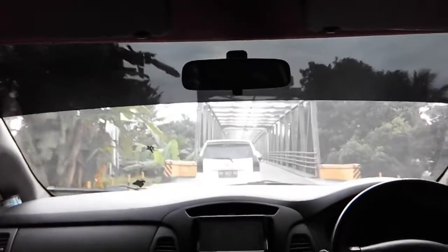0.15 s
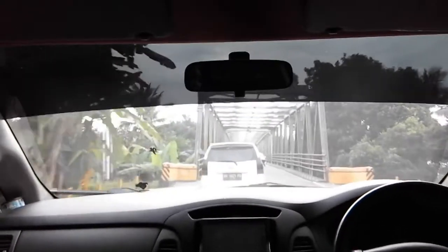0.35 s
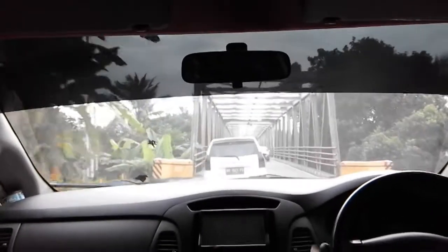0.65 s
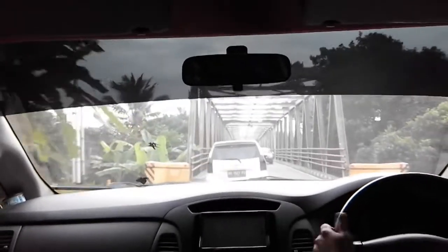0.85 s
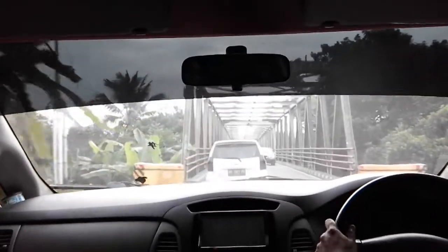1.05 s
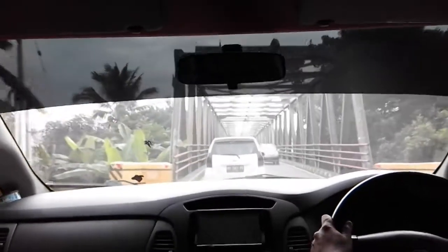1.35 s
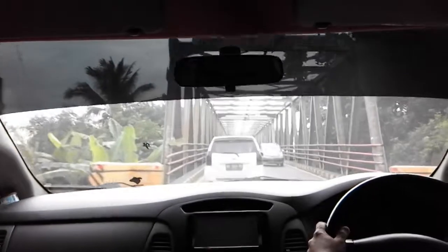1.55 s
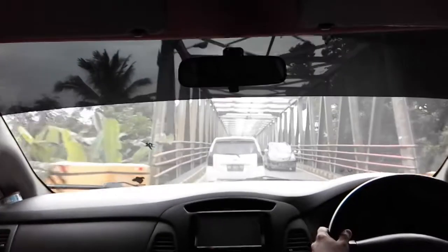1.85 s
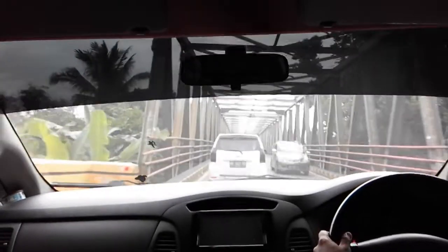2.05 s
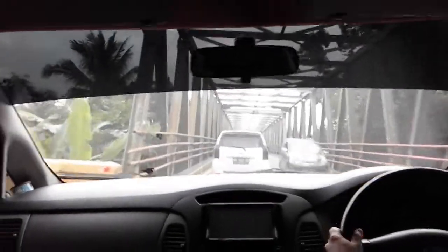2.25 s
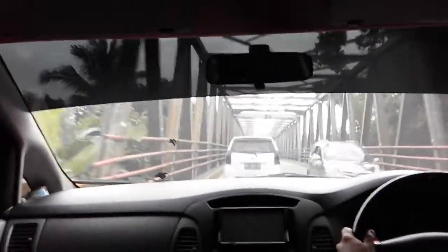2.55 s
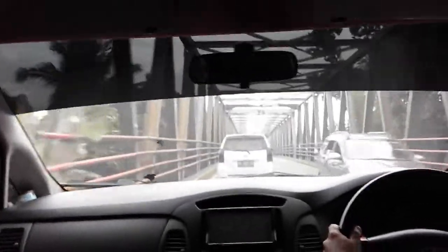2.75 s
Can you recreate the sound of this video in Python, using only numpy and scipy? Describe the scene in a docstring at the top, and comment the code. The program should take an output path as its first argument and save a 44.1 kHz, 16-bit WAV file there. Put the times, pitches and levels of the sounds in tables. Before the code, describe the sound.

A car drones along, heard from the cabin, its trim ticking and rattling at a bump.

```python
"""Inside a car rolling slowly onto a steel bridge. From the start the engine drones at a low, almost
steady firing rate, its second harmonic booming in the cabin, while road rumble comes up through the
floor. Loose trim soon begins to tick and squeak. Just after 2 s the wheels cross the joint: the floor
thuds and drums, the trim rattles, and the tyre hiss of an oncoming car swells."""
import sys
import numpy as np
from scipy import signal
from scipy.io import wavfile

SR = 44100
rng = np.random.default_rng(int(sys.argv[2]) if len(sys.argv) > 2 else 0)


def wrap_up_sound(samples):
    """Save the sound to the file named by the first command line argument, as 16-bit audio."""
    columns = np.atleast_2d(samples).T
    # keep every value between -1 and 1, then stretch to whole-number steps
    tamed = np.clip(columns, -1, 1)
    steps = np.round(tamed * 32767).astype(np.int16)
    wavfile.write(sys.argv[1], SR, steps)


N = 128331


def engine():
    """Periodic excitation: firing drives a harmonic series, with more phase jitter in higher harmonics."""
    # firing rate: t/s, f/Hz
    firing = [(0, 48.6), (.4, 48.2), (.7, 47.8), (1.5, 47.8), (1.9, 48.2), (2.2, 48.5), (2.7, 48.6),
              (2.91, 48.2)]
    # harmonics 1 (engine load), 2 (cabin boom), 3, 5 and 7: t/s, level/dB
    load = [(0.03, -46.5), (0.09, -50), (0.17, -45), (0.92, -35.5), (2.47, -34), (2.54, -37), (2.61, -38),
            (2.78, -37), (2.85, -33), (2.88, -36)]
    boom = [(0.03, -47), (0.07, -51), (0.13, -36), (0.26, -42), (0.3, -35), (0.42, -39.5), (0.5, -29.5),
            (0.57, -32.5), (0.62, -45), (0.66, -31.5), (0.72, -29.5), (0.78, -33.5), (0.86, -28.5),
            (1.01, -29), (1.05, -48), (1.089, -29), (1.31, -31.5), (1.35, -39.5), (1.43, -25.5),
            (1.5, -35.5), (1.53, -29.5), (1.75, -35), (1.77, -28), (1.97, -36.5), (2.02, -29), (2.2, -32),
            (2.24, -45), (2.29, -28.5), (2.48, -36), (2.57, -27), (2.62, -37.5), (2.66, -29), (2.86, -30.5),
            (2.88, -39)]
    third = [(0.03, -41.5), (0.16, -38), (0.55, -41), (0.79, -47), (0.89, -40.5), (1.32, -36), (1.36, -61),
             (1.43, -39), (1.52, -61), (1.63, -40), (1.74, -47.5), (1.78, -37), (1.93, -48), (1.97, -37),
             (2.02, -48.5), (2.08, -42), (2.18, -39.5), (2.21, -49), (2.26, -48), (2.36, -38),
             (2.47, -38.5), (2.5, -53), (2.53, -43), (2.59, -55), (2.7, -36), (2.78, -40), (2.88, -38)]
    fifth = [(0.03, -58), (0.5, -49.5), (0.58, -42), (0.68, -47.5), (0.76, -58), (1.07, -72), (1.93, -62),
             (2.12, -44), (2.16, -75), (2.36, -46), (2.75, -54), (2.88, -52)]
    seventh = [(0.03, -55.5), (0.19, -80), (0.92, -56), (1.84, -51), (2.1, -74), (2.16, -48.5),
               (2.2, -51.5), (2.7, -48), (2.8, -72), (2.88, -45.5)]
    # faint tones geared to the engine: multiple of the firing rate, level/dB at mean load
    geared = [(4, -61), (9.35, -61), (11, -63.5)]
    jitter_rad, jitter_hz = .08, 10
    firing_phase = 2 * np.pi * np.cumsum(in_time(firing)) / SR
    out = 0
    for multiple, level in [(1, load), (2, boom), (3, third), (5, fifth), (7, seventh)]:
        jitter = (multiple - 1) * jitter_rad * drift(jitter_hz)
        out -= from_db(in_time(level)) * np.sin(multiple * firing_phase + jitter)
    load_db = in_time(load)
    for multiple, db in geared:
        waver_db = load_db - load_db.mean() + 2.5 * drift(10.3)
        phase = multiple * (firing_phase + jitter_rad / 2 * drift(jitter_hz))
        out += from_db(db + waver_db) * np.sin(phase + rng.uniform(0, 2 * np.pi))
    return np.sqrt(2) * out  # rms to peak amplitude


def road():
    """Forced vibration: broadband road roar drives panel resonances, which rise and fall with it."""
    # course of the roar, before a 5.5 dB lift: t/s, level/dB
    roar_level = [(0.03, -48.5), (0.69, -47.5), (0.97, -45.5), (2.88, -44.5)]
    # spectrum of the roar: f/Hz, relative density level/dB
    spectrum = [(35, 17.5), (50, -24), (65, 1.5), (85, -3.5), (115, 7), (170, -2), (260, -6), (420, -10),
                (700, -14), (1000, -20), (1700, -23), (2600, -30.5), (3400, -33), (4200, -32.5),
                (5300, -35.5), (6300, -45), (7500, -31)]
    # body panel resonances: f/Hz, bandwidth/Hz, level/dB at mean roar
    panel_modes = [(262, 28, -55), (725.5, 22, -67.5), (1740, 28, -68), (1930, 25, -72), (2330, 57, -88),
                   (3184, 85, -70.5)]
    level_db = in_time(roar_level)
    panels = sum(from_db(db + 2.5 * drift(11.6)) * hum(hz, width) for hz, width, db in panel_modes)
    roar = from_db(level_db + 5.5) * banded_noise(spectrum, flicker_db=1)
    return roar + from_db(level_db - level_db.mean()) * panels


def joint_thud():
    """Damped free vibration: the joint gives the wheels one soft push, and a floor mode rings down."""
    start_s, mode_hz, level_db, t60_s, rise_s = 2.125, 320, -32, .3, .02
    t = np.clip(np.arange(N) / SR - start_s, 0, None)
    envelope = from_db(level_db - 60 * t / t60_s) * (1 - np.exp(-t / rise_s))
    return envelope * np.sin(2 * np.pi * mode_hz * t)


def trim_ticks():
    """Impact excitation: each tick rings the trim's bright modes and briefly scuffs the lower ones."""
    # ticks: t/s, dull level/dB, middle and bright level/dB relative to dull
    ticks = [(0.4495, -47, 6, -6.5), (0.456, -50, 4, -4), (0.782, -45, -14, -12), (0.859, -42, -9, -6),
             (0.8677, -56, -7, -3), (0.9542, -42, -6, 9.5), (1.0494, -45, -12, -12),
             (1.5854, -43.5, 0, 6.5), (1.896, -44.5, -1, 0), (1.9734, -47.5, 0, 7), (2.0565, -44, 0, 0),
             (2.1286, -42.5, 0, 5), (2.137, -46.5, -3, -5), (2.2037, -44.5, 0, 13),
             (2.237, -38.5, -12, -13), (2.296, -42, -8, 11), (2.3052, -45.5, 7, 16), (2.32, -38, 1, 13.5),
             (2.3274, -45.5, 3, 13), (2.3604, -46, 7, 20), (2.3703, -41.5, 2, 15), (2.3817, -39, 7, 18.5),
             (2.3997, -34.5, -7, 11), (2.408, -49, 0, 9), (2.499, -44.5, -4, -9), (2.6278, -44, -7, -11)]
    # trim modes in three registers: f/Hz, gain/dB, T60/s
    bright_modes = [(5450, -25, .007), (5730, -20, .010), (6700, -26, .007)]
    middle_modes = [(3900, -4, .01), (4400, -6, .008), (5000, -6, .008)]
    dull_modes = [(1300, -6, .008), (1690, -4, .012), (2200, -3, .01), (2450, -3, .01), (2800, -6, .007),
                  (3300, -4, .01)]
    scuff_rise_s, scuff_decay_s, top_hz = .0004, .0045, 7800
    times, dull_db, middle_db, bright_db = np.transpose(ticks)
    onsets = (times * SR).astype(int)
    clicks, scuffs = np.zeros(N), np.zeros((2, N))
    clicks[onsets] = from_db(dull_db + bright_db)
    scuffs[:, onsets] = from_db([dull_db + middle_db, dull_db]) / np.sqrt(scuff_decay_s * SR / 2)
    out = 0
    for hz, db, t60 in bright_modes:  # two resonators in series swell, then die away
        unit_peak = 2 * np.e * np.log(1000) / (t60 * SR)
        out += from_db(db) * unit_peak * ring(ring(clicks, hz, t60), hz, t60)
    rise, fall = np.exp(-1 / (scuff_rise_s * SR)), np.exp(-1 / (scuff_decay_s * SR))
    envelopes = signal.lfilter([1 - rise], np.convolve([1, -rise], [1, -fall]), scuffs + 1e-18)
    for modes, envelope in zip([middle_modes, dull_modes], envelopes):
        for hz, db, t60 in modes:
            out += from_db(db) * ring(envelope * rng.choice([-1, 1], N), hz, t60)
    return signal.sosfilt(signal.butter(6, top_hz, fs=SR, output="sos"), out)


def floor_drumming():
    """Random forcing: low floor drumming swells at 0.5-1 s, surges at 2.15 s and rises at the end."""
    # drumming of the floor pan: t/s, level/dB
    level = [(0, -62), (.5, -52), (.65, -51.5), (1.0, -52), (2.0, -66), (2.15, -46), (2.3, -64), (2.7, -60),
             (2.91, -44)]
    return from_db(in_time(level)) * rms_one(band_pass(rng.standard_normal(N), 201, 410))


def tyre_hiss():
    """Airborne rolling noise: a soft band from outside swells as a car comes the other way."""
    # hiss of the tyres: t/s, level/dB
    level = [(0, -62.5), (.8, -65.5), (1.6, -62), (2.0, -64.5), (2.3, -56), (2.6, -65.5), (2.91, -58)]
    return from_db(in_time(level)) * rms_one(band_pass(rng.standard_normal(N), 1200, 2620))


def trim_squeaks():
    """Friction excitation: rubbing trim sounds narrow resonances that stutter and fade in and out."""
    # squeaks: onset t/s, duration/s, f/Hz, bandwidth/Hz, level/dB
    squeaks = [(.7, 0.54, 4440, 120, -69), (1.792, 0.039, 3240, 150, -66), (1.92, 0.025, 4630, 200, -68),
               (2.72, 0.066, 5300, 300, -61), (2.822, 0.026, 3170, 150, -58)]
    t = np.arange(N) / SR
    out = 0
    for start, length, hz, width, db in squeaks:
        fade = np.sin(np.pi * np.clip((t - start) / length, 0, 1))
        stutter_db = 3 * drift(32)
        out += from_db(db + stutter_db) * fade * hum(hz, width)
    return out


def electronics():
    """Self-noise: even microphone hiss above 1 kHz and a faint electrical whine."""
    # lines of the whine: f/Hz, bandwidth/Hz, level/dB
    lines = [(14874, 14, -86), (14933, 8, -89)]
    whine = sum(from_db(db) * hum(hz, width) for hz, width, db in lines)
    return from_db(-68) * banded_noise([(1000, 0), (16000, 0)], flicker_db=1.4) + whine


def banded_noise(spectrum, flicker_db):
    """Spectral shaping: flickering third-octave bands follow rows of f/Hz, relative level/dB; rms 1."""
    out, common_drift = 0, drift(12)
    edges = 22 * 2 ** np.arange(0, 9.7, 1 / 3)
    white = rng.standard_normal((2, N + SR // 4))
    hz, db = np.transpose(spectrum)
    beyond_db = db[-1] - 20 if db[-1] < -20 else db[-1]
    for k, (low, high) in enumerate(zip(edges, edges[1:])):
        band = band_pass(white[k % 2], low, high)[-N:]  # neighbouring bands are uncorrelated
        level_db = np.interp(np.log(low * high) / 2, np.log(hz), db, left=-80, right=beyond_db)
        out += from_db(level_db + flicker_db * (0.5 * common_drift + drift(15.5))) * band
    return rms_one(out)


def hum(hz, width_hz):
    """Resonance: one mode selects a narrow band from white noise; rms 1."""
    return rms_one(ring(rng.standard_normal(N), hz, np.log(1000) / (np.pi * width_hz)))


def ring(x, hz, t60):
    """Damped oscillator: a unit impulse starts a unit sine that falls 60 dB in t60 seconds."""
    r, w = from_db(-60 / (t60 * SR)), 2 * np.pi * hz / SR
    return signal.lfilter([0, np.sin(w)], [1, -2 * r * np.cos(w), r * r], x + 1e-18)


def band_pass(x, low_hz, high_hz):
    """Band limiting, with skirts of 12 dB per octave."""
    return signal.sosfilt(signal.butter(2, [low_hz, high_hz], "band", fs=SR, output="sos"), x)


def drift(corner_hz):
    """Random modulation: low-passed noise of rms 1, computed at every 40th sample."""
    step, settling = 40, 2000
    r = np.exp(-2 * np.pi * corner_hz * step / SR)
    white = rng.standard_normal(N // step + settling + 2)
    slow = signal.lfilter([1], [1, -2 * r, r * r], white)[settling:]
    return np.interp(np.arange(N) / step, np.arange(len(slow)), rms_one(slow))


def in_time(rows):
    """Linear interpolation of rows of t/s, value to every sample."""
    times, values = np.transpose(rows)
    return np.interp(np.arange(N) / SR, times, values)


def from_db(db):
    """Amplitude ratio of a level in dB."""
    return 10 ** (np.asarray(db) / 20)


def rms_one(x):
    """Normalisation to rms 1."""
    return x / np.sqrt(np.mean(x ** 2) + 1e-20)


def scene():
    """Superposition: all sources add at one microphone."""
    driving = engine() + road() + tyre_hiss() + floor_drumming() + joint_thud()
    return (driving + trim_ticks() + trim_squeaks() + electronics())[None, :]


def record(dry):
    """Finite bandwidth: the microphone loses the deepest rumble, and the top is cut steeply."""
    low_hz, high_hz = 36, 15700
    dry = signal.sosfilt(signal.butter(4, low_hz, "high", fs=SR, output="sos"), dry)
    return signal.sosfilt(signal.ellip(14, .5, 60, high_hz, fs=SR, output="sos"), dry)


dry = scene()
out = record(dry)
wrap_up_sound(out)
```